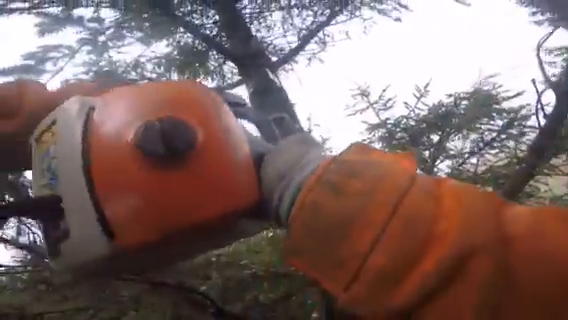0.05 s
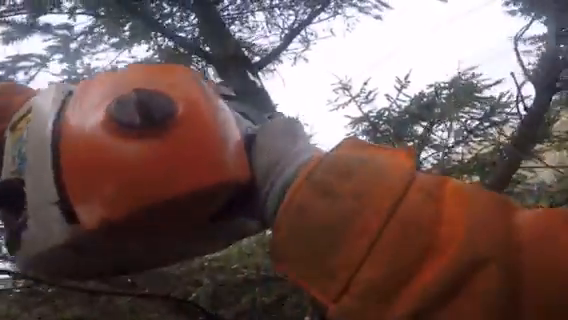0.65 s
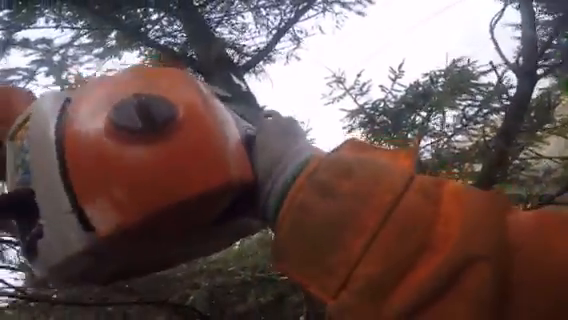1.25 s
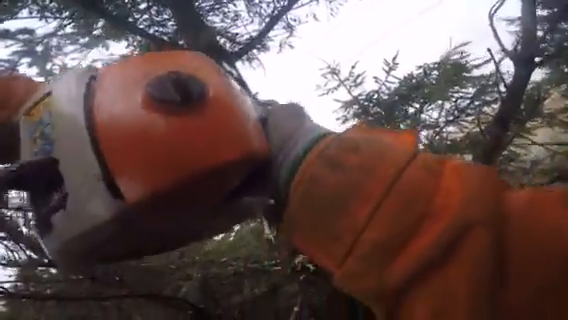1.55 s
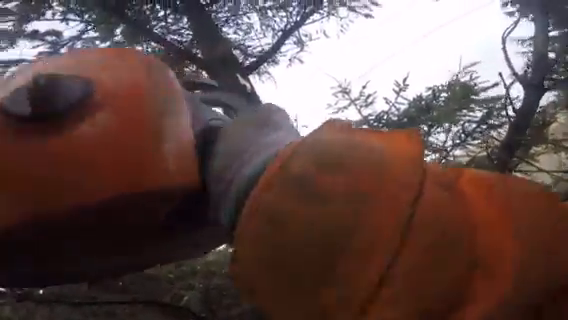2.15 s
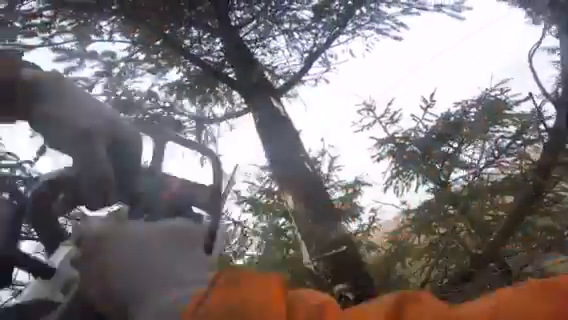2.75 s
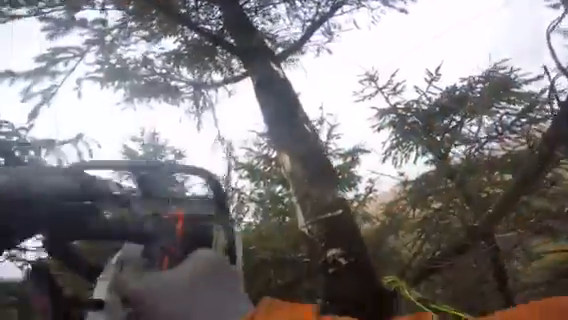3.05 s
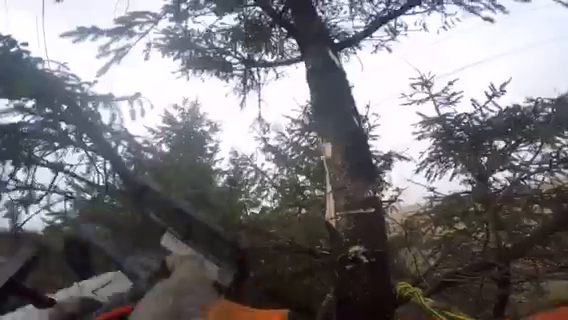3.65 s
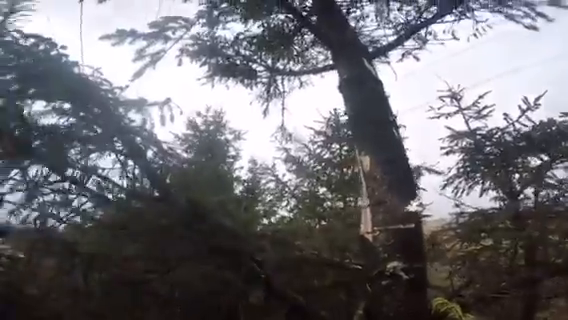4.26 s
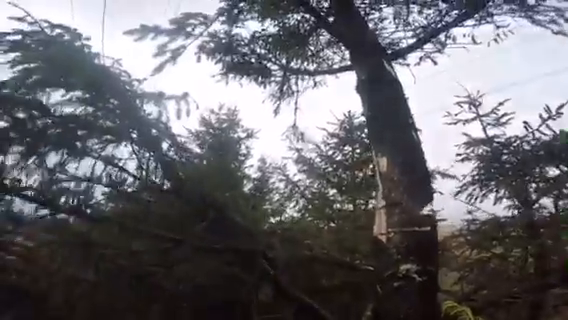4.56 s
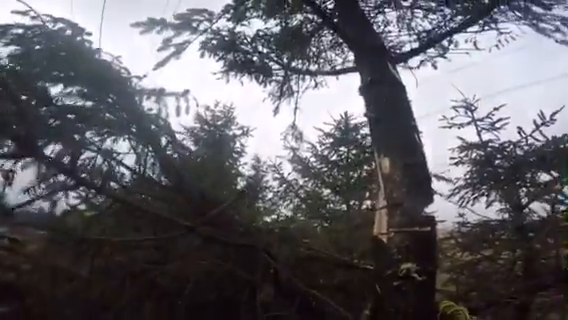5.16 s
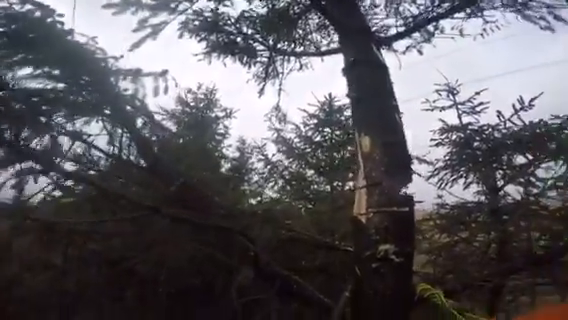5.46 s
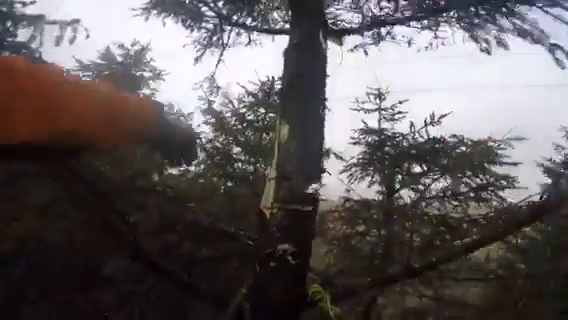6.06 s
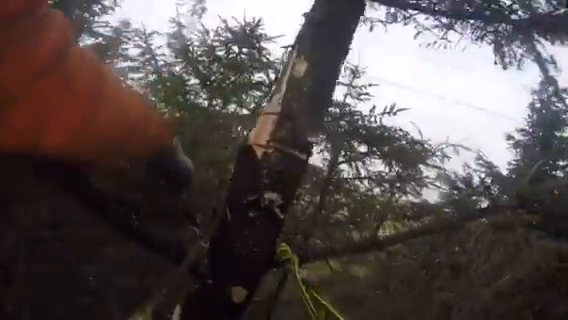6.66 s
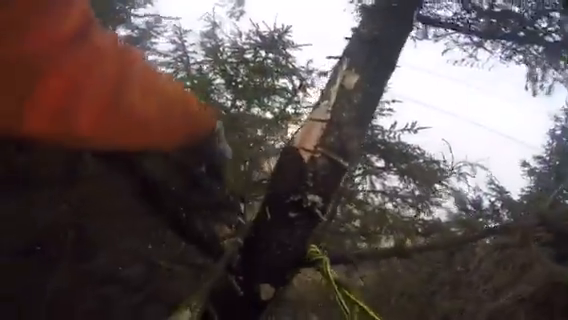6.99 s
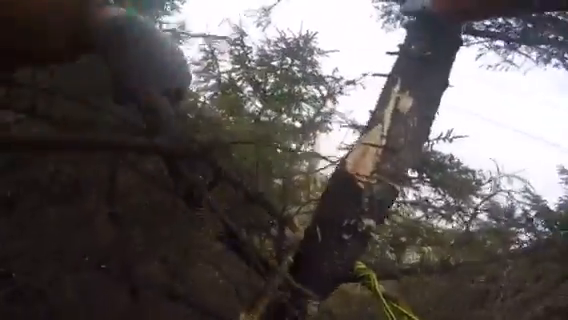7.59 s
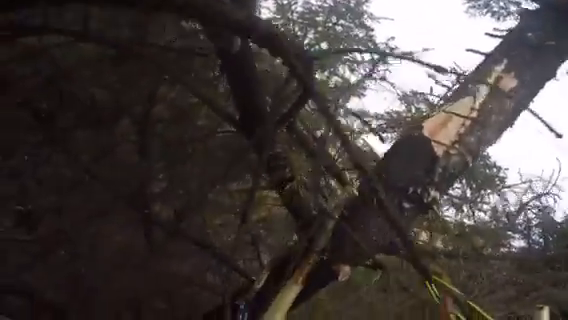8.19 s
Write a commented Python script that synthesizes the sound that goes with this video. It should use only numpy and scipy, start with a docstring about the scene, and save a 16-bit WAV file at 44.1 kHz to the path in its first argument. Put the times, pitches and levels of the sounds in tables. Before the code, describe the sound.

A close two-stroke chainsaw cuts, revs free, sinks to a popping idle and stops, followed by gear knocks, sleeve swishes and snapping twigs.

```python
"""Up a tree in a forest, a two-stroke chainsaw works close to a climber's camera. It revs, labours
through a trunk, revs free and sinks to a popping idle: firing pulses ring the muffler, the piston
clatters in the casing, and the chain hisses, whines and rattles on the bar. It is switched off and
stowed with a few knocks; sleeves swish and twigs snap over the steady hiss of the forest.
Wind and body movement rumble on the camera housing."""
import sys
import numpy as np
from scipy import signal
from scipy.fft import rfft, irfft
from scipy.io import wavfile
from scipy.ndimage import uniform_filter1d

SR = 44100
rng = np.random.default_rng(int(sys.argv[2]) if len(sys.argv) > 2 else 0)


def file_out(sig):
    """Save sig as 16-bit WAV at sys.argv[1]."""
    # one column per channel
    cols = np.atleast_2d(sig).T
    # limit, then scale
    lim = np.clip(cols, -1, 1)
    pcm = np.round(lim * 32767).astype(np.int16)
    wavfile.write(sys.argv[1], SR, pcm)


N = 367353
TIME = np.arange(N) / SR


def amp(db):
    """Decibels to gain."""
    return 10 ** (np.asarray(db) / 20)


def unit(x):
    """Scales to rms 1."""
    return x / np.sqrt(np.mean(x ** 2) + 1e-20)


def steady(x, size=5000):
    """Holds the running rms at 1."""
    return x / np.sqrt(abs(uniform_filter1d(uniform_filter1d(x ** 2, size), size)) + 1e-12)


def noise(size=N):
    """White noise."""
    return rng.standard_normal(size)


def drift(hz):
    """A random wander of rms 1, moving at rates up to hz."""
    return unit(irfft(rfft(noise()) / (1 + (np.fft.rfftfreq(N, 1 / SR) / hz) ** 4), N))


def ramp(x, zero, one):
    """Goes from 0 to 1 as x goes between two values."""
    return np.clip((x - zero) / (one - zero), 0, 1)


def swells(rows, rise_s, fall_s):
    """Envelope of (start_s, length_s, level_db) events: each fades in, holds and fades out."""
    gains = []
    for start, length, db in rows:
        fade = np.minimum((TIME - start) / rise_s, 0) - np.maximum((TIME - start - length) / fall_s, 0)
        gains.append(amp(db) * np.exp(fade))
    return np.max(gains, axis=0)


def colour(x, points, size=4096):
    """Minimum-phase EQ of unit energy through (freq_hz, gain_db) points."""
    hz, db = np.transpose(points)
    bins_hz = abs(np.fft.fftfreq(size, 1 / SR)) + 1
    log_gain = np.log(amp(np.interp(np.log(bins_hz), np.log(hz), db)))
    response = np.fft.ifft(np.exp(np.conj(signal.hilbert(log_gain)))).real[:size // 2]
    return signal.oaconvolve(x, response / np.linalg.norm(response))[:len(x)]


def disperse(x, delay_s, corner_hz):
    """Cavities hold lows back longer than highs, so each pulse becomes a short falling sweep."""
    hz = np.fft.rfftfreq(N, 1 / SR)
    return irfft(rfft(x) * np.exp(-2j * np.pi * delay_s * corner_hz * np.arctan(hz / corner_hz)), N)


def add(mix, start_s, sound):
    """Mixes a sound in at a time."""
    part = mix[max(round(start_s * SR), 0):][:len(sound)]
    part += sound[:len(part)]


def pulses(turns, uneven_db, jitter_s, size=8):
    """One sharp pulse a turn, each of its own strength and slightly early or late."""
    at = np.interp(np.arange(1, int(turns[-1])), turns, np.arange(N))
    strength, late = np.clip(rng.standard_normal((len(at), 2)).T, -2, 2)
    at = at + late * jitter_s * SR
    near = at.astype(int)[:, None] + np.arange(-size, size + 1)
    away = near - at[:, None]
    taps = amp(uneven_db * strength)[:, None] * np.sinc(away) * np.sinc(away / (size + 1))
    return np.bincount(np.clip(near, 0, N - 1).ravel(), taps.ravel(), N)


def burst(decay_s, tail_db, tail_s, rise_s=.0045, size=4000):
    """A crack of noise with a faint tail, of unit energy."""
    t = np.arange(size) / SR
    decay = np.exp(-t / decay_s) + amp(tail_db) * np.exp(-t / tail_s)
    crack = noise(size) * (1 - np.exp(-t / rise_s)) * decay
    return crack / np.linalg.norm(crack)


# Breeze in the trees: freq_hz, gain_db
FOREST_EQ = [(150, -44), (250, -7), (600, -14.5), (760, -8.5), (1510, -10.5), (1650, -3), (2570, -1),
             (5950, -10), (8670, -25), (15000, -34.5)]

def forest(hiss_db=-41, ease_db_per_s=.73, whine_hz=12610, whine_db=-74):
    """The background bed: a slowly easing breeze, and a thin steady whine."""
    hiss = amp(hiss_db - ease_db_per_s * TIME + .5 * drift(hz=6.5)) * colour(noise(), FOREST_EQ)
    return hiss + amp(whine_db) * np.sin(2 * np.pi * whine_hz * TIME)


# Rumble and soft bumps on the housing: freq_hz, gain_db
RUMBLE_EQ = [(10, -10.5), (28, 5), (50, -3), (90, -9.5), (150, -43), (300, -28), (700, -75)]
BUMP_EQ = [(25, -3), (65, 7), (110, 4), (180, -3), (300, -22), (800, -23), (2000, -56)]
# The climber jostles the camera: start_s, length_s, level_db
JOSTLES = [(2.38, 0.44, -33), (2.87, 0.7, -27.5), (3.78, 0.083, -24.5), (4.33, 0.2, -33.5),
           (4.7, 0.097, -35.5), (5.08, 0.2, -33.5), (5.47, 0.37, -31.5), (5.79, 0.84, -27),
           (6.92, 0.16, -33), (7.17, 0.41, -33.5), (7.72, 0.14, -27.5), (7.9, 0.584, -34.5)]
# The saw judders in the cut, hardest as the last wood gives: start_s, length_s, level_db
JUDDERS = [(.6, 0.64, -36.5), (1.17, 0.12, -26.5)]

def buffeting(rumble_db=-2, bump_db=-11, still_db=-40, bumps_per_s=30, judder_hz=35):
    """Handling rumbles and bumps the camera, louder as it moves more; the cut adds a low judder."""
    movement = np.maximum(swells(JOSTLES, rise_s=.03, fall_s=.058), amp(still_db))
    lumps = amp(2.6 * drift(hz=9))
    rumble = amp(rumble_db) * steady(colour(noise(), RUMBLE_EQ), size=3000) * lumps
    nudges = (rng.random(N) < bumps_per_s / SR) * noise() + .015 * noise()
    bumps = amp(bump_db) * np.sqrt(movement / np.std(movement)) * steady(colour(nudges, BUMP_EQ))
    wobble = np.sin(2 * np.pi * judder_hz * TIME + drift(hz=8.2))
    judder = unit(wobble + .33 * colour(noise(), RUMBLE_EQ))
    return movement * (rumble + bumps) + swells(JUDDERS, rise_s=.12, fall_s=.037) * judder


# Hollow rub, cloth swish, and a top-end fizz shared with the idle pops: freq_hz, gain_db
RUB_EQ = [(120, -21), (250, -3), (500, -10.5), (1150, 2.5), (1450, -5), (3000, -42)]
SWISH_EQ = [(900, -30), (1750, -7), (2160, 3.5), (2380, -8), (2800, 2), (3150, -8.5), (6300, -21),
            (10000, -50)]
FIZZ_EQ = [(1500, -15), (3500, 4), (7000, 19), (9000, 9), (15500, 3.5)]
# Sleeve strokes, the last one brightest: start_s, length_s, hollow_db, swish_db, fizz_db
STROKES = [(4.904, 0.014, -47, -41.5, -80), (5.851, 0.14, -39.5, -33, -72), (6.03, .2, -43, -39, -83),
           (6.374, .23, -37.5, -35.5, -72), (7.207, 0.14, -39.5, -33.5, -52)]

def sleeves(cloth_db=-1, catches_per_s=380):
    """Stiff fabric slides in a crunch of small catches, hollow when it presses on the camera."""
    catches = (rng.random(N) < catches_per_s / SR) * noise()
    rub = (noise() + unit(catches)) * amp(1.2 * drift(hz=30))
    strokes = np.array(STROKES)
    hollow, swish, fizz = (swells(strokes[:, [0, 1, k]], rise_s=.071, fall_s=.033) for k in (2, 3, 4))
    cloth = hollow * unit(colour(rub, RUB_EQ)) + swish * unit(colour(rub, SWISH_EQ))
    return amp(cloth_db) * cloth + fizz * colour(noise(), FIZZ_EQ)


# The stowed saw jiggles: start_s, length_s, level_db
JIGGLES = [(3.83, 0.2, -25), (4.1, .26, -35.5)]

def lanyard(slips_per_s=48, ring_hz=1150, tick_db=-16, shove_hz=85):
    """The saw settles on its lanyard in quick slips, each a tick and a shove; together they drone."""
    t = np.arange(SR // 20) / SR
    slips = pulses(np.cumsum(slips_per_s * amp(drift(hz=20))) / SR, uneven_db=2, jitter_s=0)
    scuffs = noise() * signal.oaconvolve(slips ** 2, np.exp(-t / .0015))[:N]
    tick = np.sin(2 * np.pi * ring_hz * t) * np.exp(-t / .0003)
    shove = t * np.exp(-t / .004) * np.sin(2 * np.pi * shove_hz * t)
    drone = unit(signal.oaconvolve(slips, shove)[:N])
    ticks = amp(tick_db) * unit(signal.oaconvolve(scuffs, tick)[:N])
    return swells(JIGGLES, rise_s=.03, fall_s=.037) * (drone + ticks)


def thump(db, t, hz=85, db_per_octave=22, cycles=.27):
    """A shove rocks the camera down and back once; a harder one rocks it more slowly."""
    phase = t * hz * 2 ** (-(db + 15.5) / db_per_octave)
    return -amp(db) * np.sin(2 * np.pi * phase) * phase / cycles * np.exp(1 - phase / cycles)


# A bright click, and a midrange crack shared with the idle pops: freq_hz, gain_db
CLICK_EQ = [(1200, -12), (3400, 9), (5000, 0), (6500, 6.5), (9000, 3), (15500, -2)]
CRACK_EQ = [(100, -13.5), (1400, -5.5), (2000, 3), (2800, -2.5), (4500, -10.5), (6000, -11.5), (9000, -36)]
# The throttle trigger's release, then twigs breaking: start_s, tick_db, click_db, thump_db
CLICKS_AND_SNAPS = [(1.761, -6, -24, -37), (3.9923, -33, -42.5, -39), (5.1462, -18, -44, -43),
                    (5.1523, -8, -33, -28), (6.5793, -31, -20.5, -26), (7.912, -24, -52, -20.5),
                    (8.009, -29, -53, -24), (8.128, -23, -41, -25)]

def clicks_and_snaps(ring_hz=2150, peak_s=.0018, grit_db=-9, tick_gain_db=11, click_gain_db=21):
    """The trigger springs back or a twig breaks: a bright click, a tight, gritty tick, a small jolt."""
    ticks, clicks = np.zeros((2, N))
    t = np.arange(SR // 10) / SR
    grit = amp(grit_db) * colour(noise(len(t)), CRACK_EQ)
    tick = (t * np.exp(-t / peak_s)) ** 3 * (np.sin(2 * np.pi * ring_hz * t) + grit)
    tick /= np.linalg.norm(tick)
    for start_s, tick_db, click_db, thump_db in CLICKS_AND_SNAPS:
        add(ticks, start_s, amp(tick_db + tick_gain_db) * tick + thump(thump_db, t))
        click = burst(decay_s=.0008, tail_db=-44, tail_s=.007, rise_s=.001)
        add(clicks, start_s, amp(click_db + click_gain_db) * click)
    return ticks + colour(clicks, CLICK_EQ)


# The camera housing's modes: pitch_hz, level_db, t60_s
HOUSING_MODES = [(630, -6, 0.033), (889, -1, 0.02), (1130, 2.5, 0.014), (1720, 1, 0.013),
                 (2110, 12.5, 0.0043), (2180, 3.5, 0.014), (2520, 6.5, 0.0075), (3400, -5, 0.012),
                 (4230, 1.5, 0.0069), (5740, -1.5, 0.004)]
# Gear hits the harness and the camera: start_s, crack_db, hollow_db, thump_db
GEAR_KNOCKS = [(3.256, -17, -15, -17.5), (3.634, -18, -22, -16), (3.6813, -7, -25, -21),
               (3.7332, -5.5, -24, -17), (3.7808, -8, -16, -11.5), (4.094, -26, -21, -21),
               (4.4932, -10, -16, -26), (5.752, -24, -21.5, -22), (5.773, -21, -16, -18.5),
               (5.796, -18, -20, -17), (5.814, -11, -15.5, -12), (5.831, -21, -16, -14),
               (5.897, -16, -12.5, -20.5), (6.2273, -30, -25, -15), (6.315, -17, -19, -16),
               (6.366, -22, -16, -21), (6.596, -21, -25, -19.5), (7.181, -18, -30, -20),
               (7.778, -27, -30, -25)]

def knocks(ring_db=11, thump_gain_db=1, scuff_db=-3, contact_s=.0005, size=5000):
    """Each knock lands with a scuff, rings the housing dryly in its own way and shoves the camera."""
    mix = np.zeros(N)
    t = np.arange(size) / SR
    hz, db, t60 = np.transpose(HOUSING_MODES)[:, :, None]
    hollow = hz[:, 0] < 1300
    envelopes = amp(db - 60 * t / t60) * (1 - np.exp(-t / contact_s))  # swells during contact
    for start_s, crack_db, hollow_db, thump_db in GEAR_KNOCKS:
        scuff = amp(scuff_db) * burst(decay_s=.0012, tail_db=-26, tail_s=.008, size=size)
        blow = signal.unit_impulse(size) + scuff
        detuned_hz = hz * rng.uniform(.97, 1.03, hz.shape)
        modes = envelopes * np.sin(2 * np.pi * (detuned_hz * t + rng.random(hz.shape)))
        for group, group_db in (hollow, hollow_db), (~hollow, crack_db):
            ring = signal.fftconvolve(blow, modes[group].sum(0))
            add(mix, start_s, amp(group_db + ring_db) * ring / np.linalg.norm(ring))
        add(mix, start_s, amp(thump_gain_db) * thump(thump_db, t))
    return mix


# Single firings at idle: start_s, level_db
IDLE_FIRINGS = [(2.418, -12), (2.565, -8.5), (2.672, -13), (2.79, -7), (2.868, 3.5), (2.897, -7.5),
                (3.044, -10.5), (3.147, -7), (3.247, -7.5), (3.35, -9), (3.432, -12), (3.513, -7.5),
                (3.547, -21), (3.614, -10)]

def idle_pops(bark_db=11, fizz_db=-1, lead_s=.0045):
    """At idle only every fourth turn or so catches, with a short sputter and a sharp bark."""
    bark, fizz = np.zeros((2, N))
    median_db = np.median(IDLE_FIRINGS, 0)[1]
    for start_s, db in IDLE_FIRINGS:
        sputter = burst(decay_s=.004, tail_db=-28, tail_s=.015)
        crack = burst(decay_s=.003, tail_db=-26, tail_s=.015, rise_s=.0015)
        spit = burst(decay_s=.0023, tail_db=-18.5, tail_s=.0089, rise_s=.0016)
        add(bark, start_s - lead_s, amp(min(db, median_db)) * sputter)
        add(bark, start_s, amp(db + bark_db) * crack)
        add(fizz, start_s, amp(db + fizz_db) * spit)
    return colour(bark, CRACK_EQ) + colour(fizz, FIZZ_EQ)


def rattle(push, modes, hits_per_s, size=1500):
    """Loose metal strikes at random, most often when pushed; each hit rings a new blend of modes."""
    t = np.arange(size) / SR
    hits = rng.random(N) < hits_per_s * push / np.mean(push) / SR
    mix = np.zeros(N)
    for hz, width_hz, db in modes:
        ring = t * np.exp(-1.5 * np.pi * width_hz * t) * np.sin(2 * np.pi * hz * t)
        mix += amp(db) * unit(signal.oaconvolve(hits * noise(), ring)[:N])
    return steady(mix)


# Ring of the slapped bar and of the links: pitch_hz, width_hz, level_db
SLAP_MODES = [(1644, 180, -6), (2106, 140, -2.5), (2587, 127, -1.5), (3250, 650, -7.5), (3980, 340, -13)]
LINK_MODES = [(5470, 370, 1), (6550, 650, 0.5)]

def loose_chain(turns, coasting, idling, octaves_down, slap_db=-21.5, fade_db_per_octave=3.9, slack=.3):
    """Off throttle the chain slaps the bar about once a turn; its links jingle most as it runs out."""
    push = slack + np.cos(np.pi * (turns + .22 * drift(hz=30))) ** 6
    idle_db = -2.5 + 2 * drift(hz=30)
    slap_gain = amp(slap_db - fade_db_per_octave * octaves_down + idling * idle_db)
    slaps = slap_gain * rattle(push, SLAP_MODES, hits_per_s=800)
    run_out = swells([(2.05, .41, -40.5)], rise_s=.094, fall_s=.32)
    jingle = run_out * rattle(push, LINK_MODES, hits_per_s=1100)
    return coasting * (slaps + jingle)


# The cutters bite, twice, then the chain runs down: start_s, length_s, level_db
HOWLS = [(0, 0.27, -20.5), (1.07, 0.31, -23.5), (1.8, 0.463, -27.5)]

def bar_howl(pitch_hz=1964, width_hz=230):
    """Dense hits from the chain set one resonance of the bar howling."""
    howl = rattle(np.ones(N), [(pitch_hz, width_hz, 0)], hits_per_s=650)
    return swells(HOWLS, rise_s=.12, fall_s=.037) * howl


# Where bar and cover sing: pitch_hz, width_hz, level_db
BAR_RESONANCES = [(1559, 30, -20), (1897, 54, -16.5), (1995, 43, -17.5), (2194, 77, -18.5), (2467, 79, -22),
                  (2644, 42, -15), (2870, 54, -30), (2993, 76, -19), (3660, 170, -24), (4130, 100, -19)]

def chain_whine(speed, turns, free, charge, damped_db=-6, teeth=8, sprocket_db=-22.5):
    """Crank harmonics swell on the bar's resonances, damped by the wood; the sprocket whistles."""
    def peak(hz, centre_hz, width_hz):
        return 1 / (1 + ((hz - centre_hz) / width_hz * 2) ** 4)

    grid_hz = np.arange(SR // 8)
    response = sum(amp(db) * peak(grid_hz, hz, width) for hz, width, db in BAR_RESONANCES)
    tones = np.zeros(N)
    for harmonic in range(7, 23):
        gain = np.interp(harmonic * speed, grid_hz, response) * amp(1.5 * drift(hz=25))
        tones += gain * unit(np.sin(2 * np.pi * harmonic * turns + .15 * drift(hz=50)))
    whistle_gain = amp(sprocket_db + drift(hz=25)) * peak(speed, centre_hz=210, width_hz=17.2)
    whistle = whistle_gain * unit(np.sin(2 * np.pi * teeth * turns))
    flutter = uniform_filter1d(charge, size=100)  # dips on skipped firings
    return (amp(damped_db * (2 - free)) * tones + whistle) * flutter


# The engine casing's clang: freq_hz, gain_db
CASING_EQ = [(150, -74.5), (700, -16.5), (1350, -15), (1700, -5.5), (1950, 4), (2100, 1), (2300, -9.5),
             (2550, -0.5), (3000, -5), (3400, -12), (4150, -3), (4900, -24.5), (6400, -21), (8000, -56.5)]

def piston_clatter(turns, puffs, coasting, charge, slap_db=-9, rush_db=-3.5, blur_db=6):
    """The piston knocks twice a turn over a rush of gas, which blurs the knocks off throttle."""
    slaps = amp(slap_db) * pulses(turns + .5, uneven_db=3, jitter_s=.00002)
    blows = pulses(turns, uneven_db=1.5, jitter_s=.000016) * charge + slaps
    blows = steady(disperse(blows, delay_s=.004, corner_hz=3000))
    rush = amp(rush_db + blur_db * coasting) * steady(puffs * noise())
    return steady(colour(blows + rush, CASING_EQ)) * amp(.73 * drift(hz=29.2))


# The exhaust's hard edge: freq_hz, gain_db
SHOCK_EQ = [(400, -22), (1250, -24), (1950, 5), (2600, 0.5), (4100, -10.5), (8000, -24)]

def exhaust_shocks(turns, charge, coasting, level_db=-28):
    """Under throttle each firing leaves the muffler with a hard crack."""
    firings = pulses(turns, uneven_db=6.5, jitter_s=.000015) * charge
    shocks = disperse(firings, delay_s=.001038, corner_hz=SR)
    return (1 - coasting) * amp(level_db) * steady(colour(shocks, SHOCK_EQ))


# The muffler's voice, throttle open and shut: freq_hz, gain_db
BARK_EQ = [(40, -12), (110, 9), (200, 4), (400, 2.5), (480, 6.5), (560, -10), (650, 4), (860, -2.5),
           (960, -9.5), (1050, -3), (1130, 0), (1400, -19.5), (2500, -28.5)]
PUTTER_EQ = [(40, -35), (120, -6), (270, 3.5), (520, -0.5), (850, -6), (1100, -15.5), (2500, -84)]

def exhaust(turns, puffs, coasting, idling, charge, gas_db=-3):
    """Firing pulses ring the muffler; off throttle they soften, and idle as an uneven putter of gas."""
    firings = pulses(turns, uneven_db=0, jitter_s=.00001) * charge
    bark = colour(disperse(firings, delay_s=.00442, corner_hz=686), BARK_EQ)
    soft = pulses(turns + .12 * idling * drift(hz=30), uneven_db=.8, jitter_s=.00002)
    soft *= amp(2.5 * idling * drift(hz=30))
    soft = disperse(soft, delay_s=.00801, corner_hz=505)
    spits = steady(puffs * noise() * amp(3.5 * drift(hz=120)))
    putter = colour(steady(soft) + amp(gas_db) * .5 * (1 + idling) * spits, PUTTER_EQ)
    return steady((1 - coasting) * steady(bark) + coasting * steady(putter))


SHUT_S, OFF_S = 1.728, 3.67  # the throttle shuts; the engine is switched off
# Crank revs under throttle: time_s, speed_hz
REV_CURVE = [(0.0, 112), (0.052, 138.6), (0.1, 160), (0.2, 196), (0.26, 208), (0.378, 214), (0.45, 212.7),
             (0.558, 202), (0.615, 192.3), (0.96, 186), (1.234, 187), (1.282, 192), (1.416, 219),
             (1.462, 222.7), (1.712, 220.8)]

def crank(idle_hz=39.05, coast_s=.485, stop_s=.9):
    """The crank follows the throttle, coasts to idle and runs down once switched off."""
    driven = np.interp(TIME, *np.transpose(REV_CURVE))
    speed = np.maximum(driven * np.exp(-np.maximum(TIME - SHUT_S, 0) / coast_s), idle_hz)
    octaves_down = np.log2(driven / speed)
    speed *= np.exp(-np.maximum(TIME - OFF_S, 0) / stop_s)
    turns = .9 + np.cumsum(speed * (1 + .004 * drift(hz=25))) / SR
    # nudge the phase so that each idle pop lands on a whole turn
    fired_s = np.array(IDLE_FIRINGS)[:, 0]
    nudge = np.unwrap(np.r_[0, -np.interp(fired_s, TIME, turns)], period=1)
    return speed, turns + np.interp(TIME, np.r_[SHUT_S, fired_s], nudge), octaves_down


# The running chain's hiss: freq_hz, gain_db
CHAIN_EQ = [(3000, 5), (6500, 15), (8200, 2), (9200, 4.5), (11000, -5.5), (12300, -2.5), (13200, 0),
            (15500, -19)]
# How clatter and hiss ride the revs: cut_db, free_offset_db, coast_loss_db_per_octave, idle_offset_db
CLATTER_LEVELS = (-14, -1, 4.5, -5.5)
HISS_LEVELS = (-33, 2, 5.5, -6)
# Near top speed the engine skips firings in a regular beat: start_s, end_s, period_turns
MISFIRES = [(.43, .67, 3), (1.44, 1.75, 4)]

def chainsaw(cut_hz=206, free_hz=208, clutch_hz=(52.8, 79.3), skip_depth=.62, screen_db_per_s=2.5):
    """Crank speed and throttle drive exhaust, casing and chain together."""
    speed, turns, octaves_down = crank()
    coasting = ramp(TIME - SHUT_S, 0, .055)
    free = ramp(speed, cut_hz, free_hz)  # 0 labouring in the wood, 1 running free
    idling = 1 - ramp(speed, *clutch_hz)  # the clutch lets the chain go
    running = amp(-41 * np.maximum(TIME - OFF_S, 0))
    skipped = sum((TIME > start) * (TIME < end) * (np.round(turns) % period == 0)
                  for start, end, period in MISFIRES)
    charge = 1 - skip_depth * skipped
    # the noise layers pulse once a turn
    idle_puffs = 1 + np.cos(np.pi * turns) ** 6
    puffs = (1 - idling) * (.5 + np.exp(-(turns % 1))) + idling * idle_puffs

    # a faster crank takes less charge, and the trunk screens the muffler as the saw sinks in
    open_db = -23 - 3.5 * np.log2(speed / cut_hz) - screen_db_per_s * TIME
    shut_db = -34.5 - 1.5 * (1 - idling)  # softer while it coasts, starved, above idle
    muffler_gain = amp((1 - coasting) * open_db + coasting * shut_db)
    shake = amp(1) * idling * np.sin(2 * np.pi * turns)
    muffler = muffler_gain * (exhaust(turns, puffs, coasting, idling, charge) + shake)

    casing_db, chain_db = (db + free_db * free - loss_db * octaves_down + idle_db * idling
                           for db, free_db, loss_db, idle_db in (CLATTER_LEVELS, HISS_LEVELS))
    clatter = amp(casing_db - 3 - 5 * coasting) * piston_clatter(turns, puffs, coasting, charge)
    hiss = amp(chain_db + 4) * steady(colour(puffs * noise(), CHAIN_EQ))
    whine = (1 - idling) * amp(-7 * octaves_down) * chain_whine(speed, turns, free, charge)
    loose = loose_chain(turns, coasting, idling, octaves_down)
    shocks = exhaust_shocks(turns, charge, coasting)
    return running * (muffler + clatter + hiss + loose + whine) + shocks + bar_howl()


def scene():
    """The saw, the climber and the forest, mixed to mono."""
    saw = chainsaw() + idle_pops()
    return (saw + knocks() + clicks_and_snaps() + lanyard() + sleeves() + buffeting() + forest())[None]


def record(dry):
    """Caps the peaks at full scale and cuts the very top of the treble."""
    low_pass = signal.firwin(511, 15600, window=("kaiser", 9), fs=SR)
    return signal.oaconvolve(np.clip(dry, -1, 1), low_pass[None], "same")


dry = scene()
out = record(dry)
file_out(out)
```